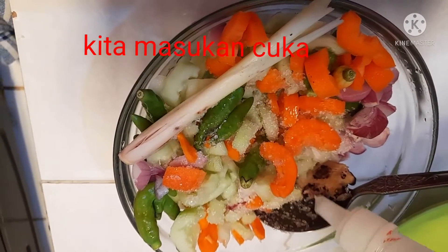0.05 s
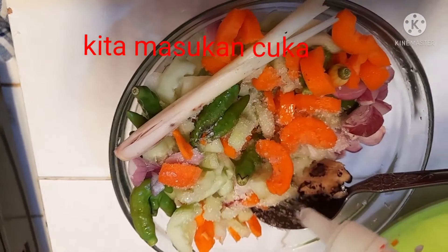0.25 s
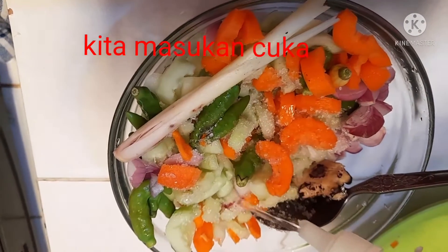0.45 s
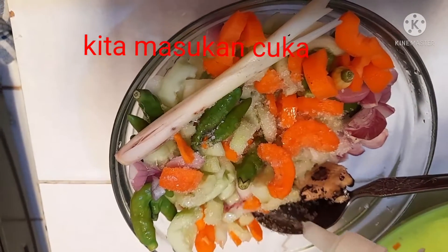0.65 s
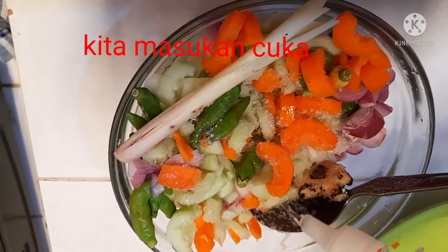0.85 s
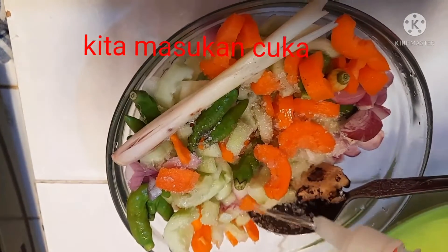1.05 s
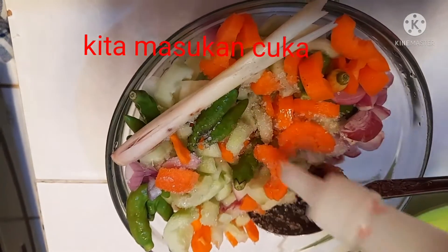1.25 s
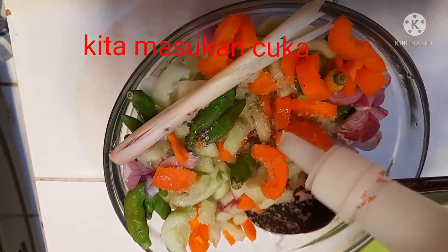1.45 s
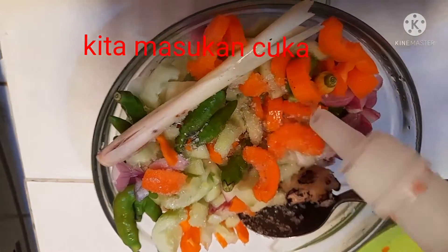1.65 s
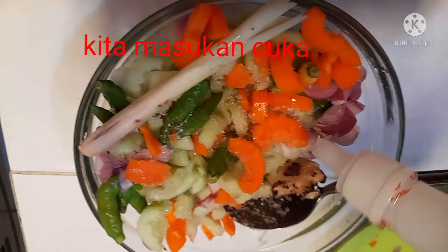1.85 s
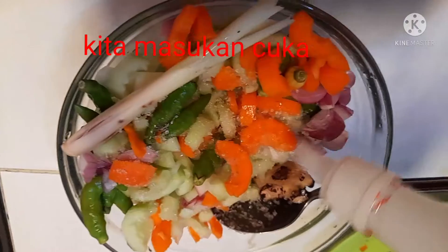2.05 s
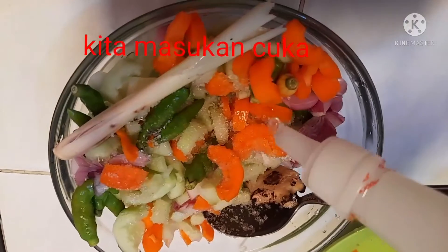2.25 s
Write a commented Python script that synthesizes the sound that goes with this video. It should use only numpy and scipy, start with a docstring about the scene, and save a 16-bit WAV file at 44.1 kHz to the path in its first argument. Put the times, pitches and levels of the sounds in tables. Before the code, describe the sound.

A plastic squeeze bottle sputters as it squirts liquid over vegetables. Irregular wet pops and fizzy spurts grow busiest past the middle, then thin out. It is close and to the left, in a small, quiet kitchen.

```python
"""In a small tiled kitchen, vinegar is squeezed from a plastic bottle over vegetables in a glass bowl.
Air and liquid sputter in the nozzle: bubbles ring briefly, the bottle pops, and air hisses back in.
The spray fizzes with tiny drops, froth crackles as it bursts, and bigger drops tick on the vegetables.
It all comes from close by on the left, with a short room echo over a low electrical hum."""
import sys
import numpy as np
from scipy import signal
from scipy.fft import rfft, irfft
from scipy.io import wavfile

SR = 44100
rng = np.random.default_rng(int(sys.argv[2]) if len(sys.argv) > 2 else 0)


def waveform_to_disk(signal):
    """Save audio, clipped to [-1, 1], as 16-bit WAV at the path in sys.argv[1]."""
    frames = np.transpose(np.atleast_2d(signal))
    scaled = np.clip(frames, -1, 1) * 32767
    samples = np.round(scaled).astype(np.int16)
    wavfile.write(sys.argv[1], SR, samples)


N = 101429

# A fade_s is the time to die away by 60 dB. A tone table turns each frequency up or down.
# tone of the room's rumble and hiss: frequency_hz, gain_db
BACKGROUND_TONE = [(31, -30.5), (41, -0.5), (53, 2), (68, 0), (110, 2), (180, -9), (330, -13.5), (640, -28),
                   (1300, -35.5), (2200, -39.5), (4500, -30), (6300, -50), (8200, -30), (10500, -37),
                   (15500, -37.5)]
# spurts of spray: peak_s, rise_s, fade_s, level_db
SPURTS = [(.01, 0.0081, 0.59, -60.5), (.165, 0.0084, 0.26, -56.5), (0.23, 0.0041, 0.18, -44.5),
          (0.63, 0.023, 0.28, -51.5), (0.673, 0.014, 0.25, -49), (1.041, 0.0028, 0.65, -52),
          (1.18, 0.15, 0.4, -63.5), (1.47, 0.014, 0.19, -45), (1.556, 0.014, 0.26, -46),
          (1.59, 0.026, 0.05, -44), (1.658, 0.011, 0.091, -53.5), (1.775, .014, 0.054, -41.5),
          (1.992, 0.0048, 0.065, -55), (2.139, 0.0035, 0.4, -61), (2.246, 0.0023, 0.18, -56.5)]
# tone of the spray: frequency_hz, gain_db
SPRAY_TONE = [(200, 13), (800, -20), (1600, 5), (3000, -1), (5000, 3), (8000, 2), (10500, -6.5), (13000, 0),
              (16000, -9)]
# air drawn through the nozzle: start_s, length_s, middle_hz, width_hz, level_db
AIR_HISSES = [(0.01, 0.15, 1570, 635, -59.5), (0.605, 0.051, 1890, 890, -59),
              (1.034, 0.24, 1620, 420, -68.5), (2.01, 0.15, 2145, 194, -62.5)]
# bubbles ringing in the nozzle and bottle: start_s, pitch_hz, level_db, fade_s
BUBBLES = [ (0.1622, 1200, -18.5, 0.003), (0.23, 864, -11, 0.006), (0.2304, 507, -27.5, 0.034),
           (0.232, 2560, -26, 0.016), (.2860, 3790, -3.5, 0.0075), (0.2890, 4435, -3.5, 0.013),
           (0.2868, 2920, -21.5, 0.011), (.2440, 262, -37, 0.059), (0.7848, 1645, -26.5, 0.013),
           (0.8202, 507, -26, 0.041), (0.8218, 2192, -19, 0.022), (0.821, 1510, -18, 0.011),
           (0.8194, 1100, -21, 0.016), (.8254, 795, -26.5, 0.048), (0.8216, 9640, -27.5, 0.0046),
           (0.8195, 4670, -23.5, 0.0057), (0.8878, 680, -11, 0.012), (.8940, 420, -27.5, 0.026),
           (0.912, 2140, -30, 0.043), (0.9184, 1010, -16, 0.0037), (1.0376, 8680, -4.5, 0.0031),
           (1.2175, 4860, -23.5, 0.0049), (1.2196, 7250, -20, 0.0023), (1.324, 4710, -11, 0.0094),
           (1.3611, 933, -15, 0.009), (1.3655, 691, -22, 0.036), (1.4208, 307, -19.5, 0.02),
           (1.4234, 2510, -9, 0.0054), (1.4647, 392, -23.5, 0.031), (1.4750, 1782, -19, 0.019),
           (1.4750, 244, -28.5, 0.02), (1.4854, 270, -26.5, 0.027), (1.4902, 386, -30, 0.044),
           (1.506, 1595, -34, 0.068), (1.5082, 1173, -33, 0.033), (1.6334, 1520, -17.5, 0.0022),
           (1.6630, 431, -28, 0.018), (1.786, 3580, -6, 0.0029), (1.7852, 2160, -30, 0.0046),
           (1.990, 394, -44, 0.039)]
# pops of the bottle and bursting films: start_s, thud_db, snap_db, spit_db, spit_fade_s
POPS = [ (0.1631, -49, -39, -47, 0.011), (0.2298, -35.5, -20.5, -30.5, 0.0068),
        (0.2455, -32, -29, -36, 0.0065), (.2860, -34.5, -23, -20, 0.0071), (0.8202, -21, -19.5, -45, 0.032),
        (.8870, -40.5, -49.5, -44.5, 0.015), (0.9128, -45, -23.5, -45.5, 0.019),
        (1.0377, -54, -32.5, -18.5, 0.0046), (1.3618, -21.5, -19, -29.5, 0.0093),
        (1.4208, -24.5, -22.5, -44, 0.068), (1.4275, -29, -24, -41, 0.013),
        (1.5010, -33.5, -40, -34, 0.029), (1.594, -41, -35, -34.5, 0.03),
        (1.6630, -24.5, -23, -30.5, 0.012), (1.7848, -48, -23.5, -45, 0.0047),
        (1.905, -58, -65, -38.5, 0.016)]
# tone of the liquid spat out with a pop: frequency_hz, gain_db
SPIT_TONE = [(200, -13.5), (1200, -23), (3000, 9), (5500, 0.5), (8000, 2.5), (10500, -11), (13000, 2),
             (16000, -20.5)]
# films of froth bursting: start_s, level_db
CRACKLES = [(0.232, -32.5), (.2642, -31), (0.6082, -37), (.7645, -33.5), (1.3238, -32.5), (1.4672, -31),
            (1.5088, -29.5), (1.553, -35), (1.5681, -25.5), (1.5918, -32), (1.6632, -23), (1.7705, -31),
            (1.841, -37.5), (1.9053, -30), (1.9445, -37.5), (2.1188, -38.5), (2.2472, -36)]
# tone of those bursts: frequency_hz, gain_db
CRACKLE_TONE = [(700, -19.5), (2000, -2), (8000, -2), (10500, -9), (14500, -7)]
# bursts of very fine froth: start_s, level_db, fade_s
SIZZLES = [(0.2332, -40, 0.0045), (1.4218, -30.5, 0.014), (1.43, -59.5, 0.39), (1.4665, -45, 0.038),
           (1.591, -43.5, 0.029)]
# single drops hitting the vegetables: start_s, pitch_hz, level_db
TICKS = [(.526, 5270, -45), (.637, 5300, -39), (0.6628, 7300, -31), (0.681, 7640, -36.5),
         (1.077, 3880, -37), (1.145, 7900, -37.5)]
# small bubbles coming to the surface: start_s, start_pitch_hz, level_db
CHIRPS = [(1.432, 467, -41.5), (1.993, 481, -52)]
# sound bouncing off the bowl and counter: delay_s, gain_db
ECHOES = [(.0021, -14), (.0062, -26.5)]
# tone of the room's echo against the direct sound: frequency_hz, gain_db
ROOM_TONE = [(100, -16), (330, -3), (550, -6.5), (780, -9.5), (1400, -13), (2300, -14.5), (3900, -18),
             (4600, -24), (5600, -13.5), (8700, -19), (13000, -12.5)]
# dulling at the right microphone, farther from the bottle: frequency_hz, gain_db
RIGHT_TONE = [(100, -37.5), (300, 0), (600, -7), (1000, -6.5), (2000, -7), (4000, -23), (8500, -16),
              (13000, -10)]

ATTACK_S, TOP_HZ = 0.00064, 15600  # how fast bubbles and spits build up; upper limit of the treble


def undb(db):
    """Turn decibels into a number to multiply by."""
    return 10 ** (np.asarray(db) / 20)


def unit(x):
    """Scale a sound to an average (rms) strength of 1."""
    return x / np.sqrt(np.mean(x ** 2))


def tone(x, points):
    """Shape a sound with a tone table."""
    hz, db = np.array(points, float).T
    size = x.shape[-1] + 4096
    bin_hz = np.arange(size // 2 + 1) * SR / size
    gain = undb(np.interp(np.log(bin_hz + 1), np.log(hz), db))
    return irfft(rfft(x, size) * gain, size)[..., :x.shape[-1]]


def let_through(x, hz, part="low", order=2):
    """Let through the low part, the high part or a band of a sound."""
    return signal.sosfilt(signal.butter(order, hz, part, fs=SR, output="sos"), x)


def fade(t, fade_s):
    """Die away by 60 dB every fade_s seconds."""
    return np.exp(-np.log(1000) * t / max(fade_s, 1e-4))


def add(out, start_s, x):
    """Mix in a short sound at start_s."""
    i = max(int(start_s * SR), 0)
    out[i:i + len(x)] += x[:max(N - i, 0)]


def late(x, delay_s):
    """Make a sound arrive later."""
    return np.interp(np.arange(N) - round(delay_s * SR), np.arange(N), x, left=0)


def ring(t, hz, cycles):
    """A pure note that dies away over the given number of cycles."""
    return np.sin(2 * np.pi * hz * t) * fade(t, cycles / hz)


def spread(pair):
    """Sound from all around is alike left and right in the bass, but unrelated in the treble."""
    side = let_through(pair[1], hz=430, part="high", order=1)
    return np.array([pair[0] + side, pair[0] - side]) / np.sqrt(2)


def background(hum_hz=99.1):
    """The room rumbles and hisses faintly under a wavering electrical hum."""
    t = np.arange(N) / SR
    waver = np.interp(t * 10, np.arange(64), rng.standard_normal(64))
    hum = np.sqrt(2) * np.sin(2 * np.pi * hum_hz * t) * (1 + 0.154 * waver)
    rumble = unit(spread(tone(rng.standard_normal((2, N)), BACKGROUND_TONE)))
    return undb(-59) * rumble + undb(-58) * hum


def droplets(drops_per_s=1400, middle_hz=5020, spread_octaves=1.3):
    """Tiny drops patter, each with a note and a click; most are faint, a few are louder."""
    notes, clicks, t = np.zeros(N), np.zeros(N), np.arange(SR // 80) / SR
    for when, pitch, size in rng.random((int(drops_per_s * N / SR), 3)):
        hz = min(middle_hz * 2 ** (spread_octaves * (2 * pitch - 1)), TOP_HZ)
        gain = undb(-4 * np.log(size + .02))
        note = ring(t, hz, cycles=18) * (1 - np.exp(-t * hz / 2))
        add(notes, when * N / SR, gain * np.sqrt(hz) * note)
        clicks[int(when * N)] += gain
    return unit(unit(notes) + .6 * unit(clicks * rng.choice([-1, 1], N)))


def spray():
    """Drops crackle in a fine, hissing mist; each spurt swells and dies away."""
    power, t = np.zeros(N), np.arange(N) / SR
    for peak_s, rise_s, fade_s, db in SPURTS:
        swell = np.exp(np.minimum(t - peak_s, 0) / rise_s)
        power += (undb(db) * swell * fade(np.maximum(t - peak_s, 0), fade_s)) ** 2
    drops = droplets()
    mist = 0.7 * rng.standard_normal((2, N))
    return np.sqrt(power) * unit(tone(drops + mist, SPRAY_TONE))


def air():
    """Air hisses softly as it is sucked back through the nozzle."""
    out = np.zeros(N)
    for start_s, length_s, hz, width_hz, db in AIR_HISSES:
        n = int(length_s * SR)
        hiss = unit(let_through(rng.standard_normal(N), [hz - width_hz / 2, hz + width_hz / 2], "band"))
        add(out, start_s, undb(db) * hiss[:n] * signal.windows.tukey(n, .5))
    return out


def wobble(t):
    """The quick, random trembling of a bubble's wall."""
    return unit(let_through(rng.standard_normal(len(t)), hz=300))


def rising_note(t, start_hz, octaves_per_s):
    """A bubble's note slides upward a little unsteadily."""
    hz = start_hz * 2 ** (octaves_per_s * t) * (1 + .01 * wobble(t))
    return np.sin(2 * np.pi * np.cumsum(hz) / SR)


def bubbles():
    """Each pocket of trapped air rings briefly, rising slightly in pitch."""
    out, t = np.zeros(N), np.arange(SR // 12) / SR
    attack = 1 - np.exp(-t / ATTACK_S)
    for start_s, hz, db, fade_s in BUBBLES:
        add(out, start_s, -undb(db) * rising_note(t, hz, octaves_per_s=2.26) * attack * fade(t, fade_s))
    return out


def knock(hz, width_hz):
    """A shake that stops almost at once; more width makes it shorter."""
    t = np.arange(SR // 50) / SR
    shake = np.gradient(np.sin(2 * np.pi * hz * t) * t ** 2 * np.exp(-2 * np.pi * width_hz * t))
    return shake / np.abs(shake).max()


def pops():
    """The plastic gives a low thud and a brighter snap, with a spit of liquid."""
    out, t = np.zeros(N), np.arange(SR // 20) / SR
    thud = knock(hz=531, width_hz=416)
    snap = let_through(knock(hz=1635, width_hz=1400), hz=3230, order=6)  # soft plastic dulls the snap
    attack = 1 - np.exp(-t / ATTACK_S)
    for start_s, thud_db, snap_db, spit_db, fade_s in POPS:
        add(out, start_s, -undb(thud_db) * thud - undb(snap_db) * snap)
        spit = unit(tone(rng.standard_normal(len(t)), SPIT_TONE))
        add(out, start_s, undb(spit_db) * spit * attack * fade(t, fade_s))
    return out


def crackles():
    """Single films of froth burst with a crisp, dry click."""
    out, t = np.zeros(N), np.arange(SR // 100) / SR
    for start_s, db in CRACKLES:
        add(out, start_s, undb(db) * rng.standard_normal(len(t)) * fade(t, fade_s=.005))
    return tone(out, CRACKLE_TONE)


def sizzle(band_hz=(11300, 14700)):
    """Fine froth bursts at the nozzle with a very high hiss."""
    out, t = np.zeros(N), np.arange(SR // 4) / SR
    for start_s, db, fade_s in SIZZLES:
        hiss = unit(let_through(rng.laplace(size=len(t)), band_hz, "band"))
        add(out, start_s, undb(db) * hiss * fade(t, fade_s))
    return out


def ticks():
    """Bigger drops land on the vegetables, each with a very short, high note."""
    out, t = np.zeros(N), np.arange(SR // 80) / SR
    for start_s, hz, db in TICKS:
        add(out, start_s, undb(db) * ring(t, hz, cycles=45))
    return out


def chirps(length_s=0.021):
    """Small bubbles give a rough upward chirp as they reach the surface."""
    out, t = np.zeros(N), np.arange(length_s * SR) / SR
    swell = np.sin(np.pi * t / length_s)
    for start_s, hz, db in CHIRPS:
        note = rising_note(t, hz, octaves_per_s=74.6)
        add(out, start_s, undb(db) * note * swell * (1 + .5 * wobble(t)))
    return out


def gurgle(start_s=1.452, length_s=.065, count=14, low_hz=510, high_hz=3040):
    """Air churns through the liquid in the bottle's neck, making a jumble of short-lived bubbles."""
    out, t = np.zeros(N), np.arange(SR // 40) / SR
    for k, (when, pitch, strength) in enumerate(rng.random((count, 3))):
        hz = low_hz * (high_hz / low_hz) ** pitch
        note = ring(t, hz, cycles=11.8) * (1 - np.exp(-t / ATTACK_S))
        add(out, start_s + length_s * (k + when) / count, undb(-28.5) * strength * note)
    return out


def kitchen(x, split_hz=2500, build_s=0.006):
    """Sound bounces around the tiled room and blurs into a short echo."""
    t = np.arange(int(SR * .7)) / SR
    low = let_through(rng.standard_normal((2, len(t))), split_hz) * fade(t, fade_s=0.37)
    high = let_through(rng.standard_normal((2, len(t))), split_hz, "high") * fade(t, fade_s=0.39)
    tail = (low + high) * (1 - np.exp(-(t / build_s) ** 2))
    tail = spread(unit(tail) / np.sqrt(len(t)))
    return tone(signal.fftconvolve(x[None], tail, axes=1)[:, :N], ROOM_TONE)


def scene():
    """The bottle is near the left microphone; its sputter reaches the right one later and duller."""
    sputter = bubbles() + chirps() + gurgle() + pops() + crackles() + ticks() + air()
    spray_left, spray_right = spray()
    near = sputter + sum(undb(db) * late(sputter, delay_s) for delay_s, db in ECHOES)
    far = tone(late(near, delay_s=.00011), RIGHT_TONE)
    direct = np.array([near + spray_left, far + undb(-11.5) * spray_right])
    room = kitchen(sputter + spray_left)
    froth = np.array([sizzle(), sizzle()])  # equally loud on both sides
    return direct + room + froth + background()


def record(dry):
    """The phone that picks up the sound cuts off the highest treble."""
    return signal.sosfilt(signal.ellip(8, .2, 70, TOP_HZ, fs=SR, output="sos"), dry)


dry = scene()
out = record(dry)
waveform_to_disk(out)
```